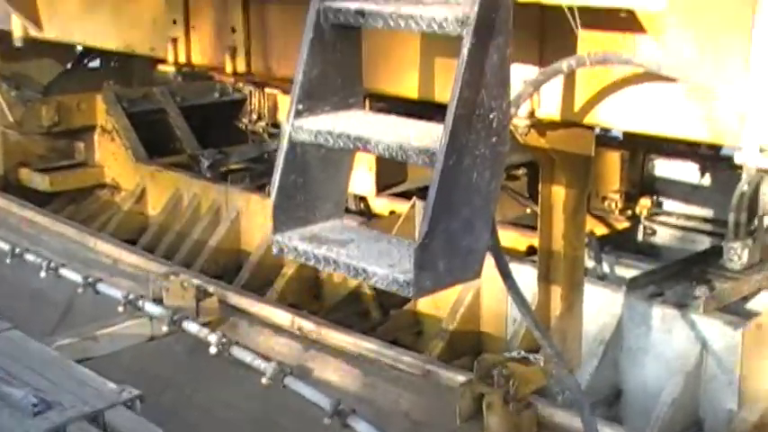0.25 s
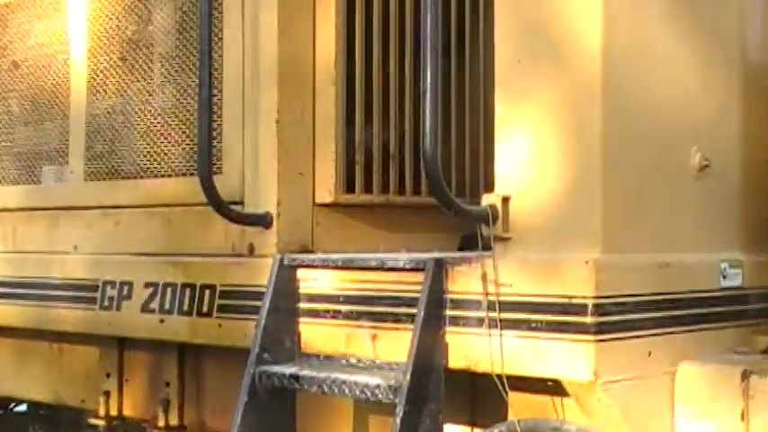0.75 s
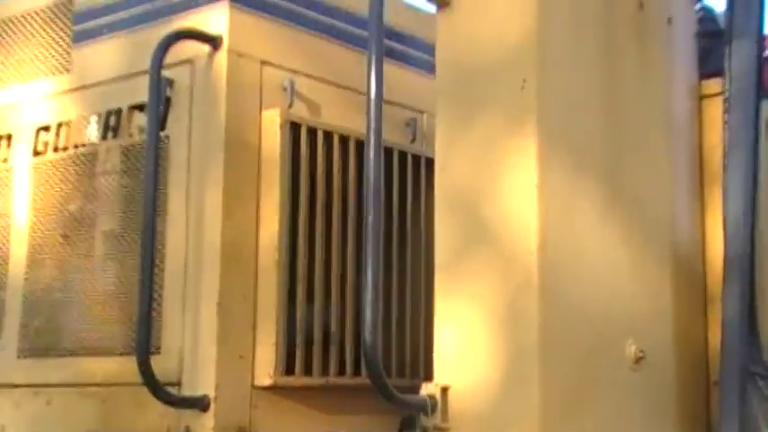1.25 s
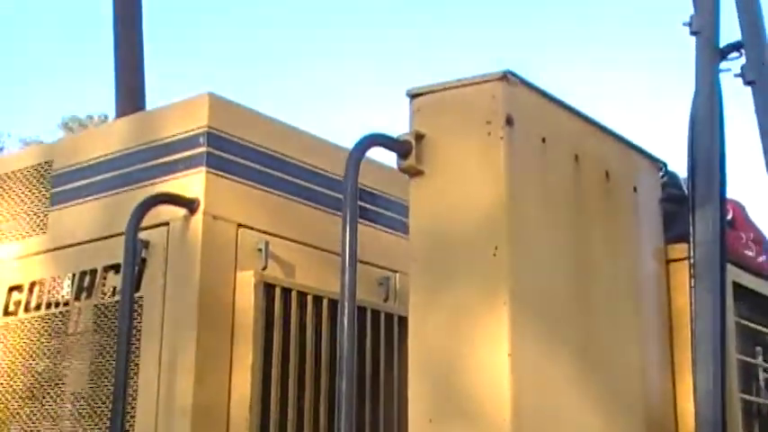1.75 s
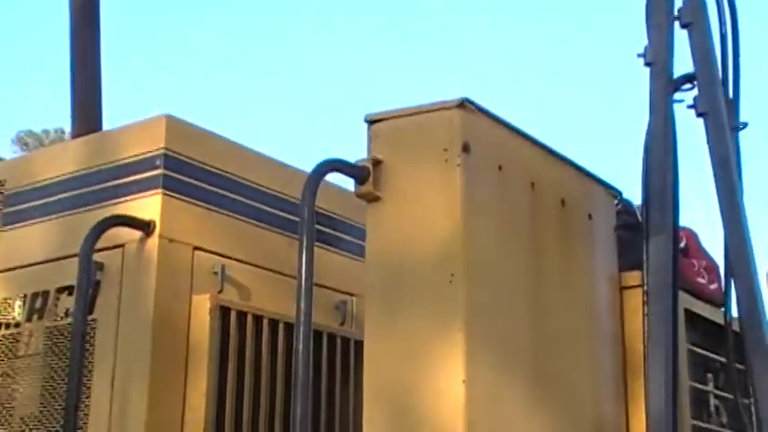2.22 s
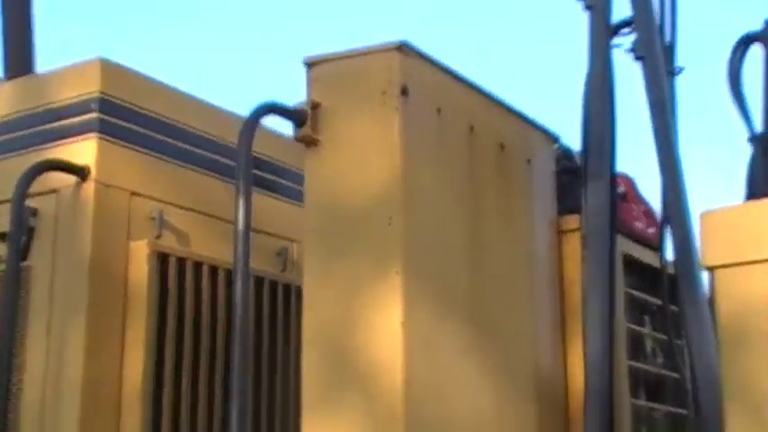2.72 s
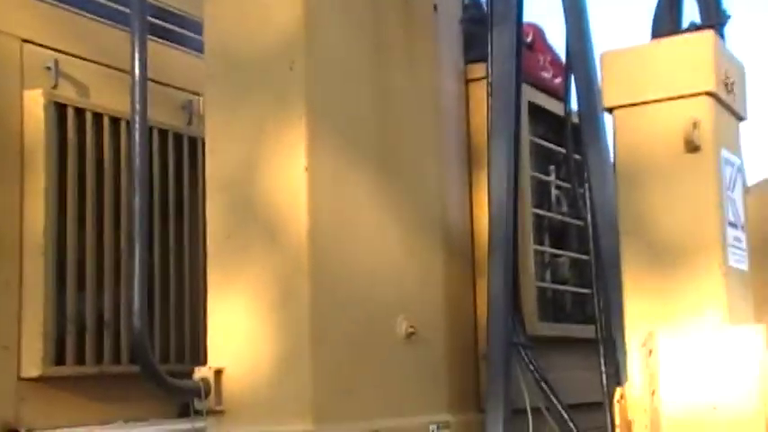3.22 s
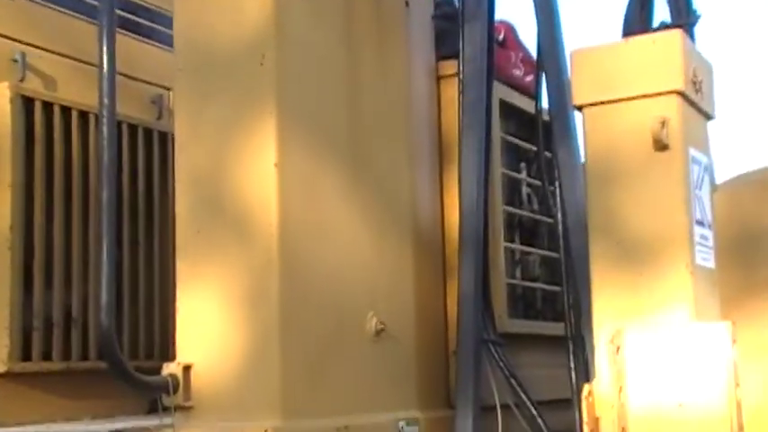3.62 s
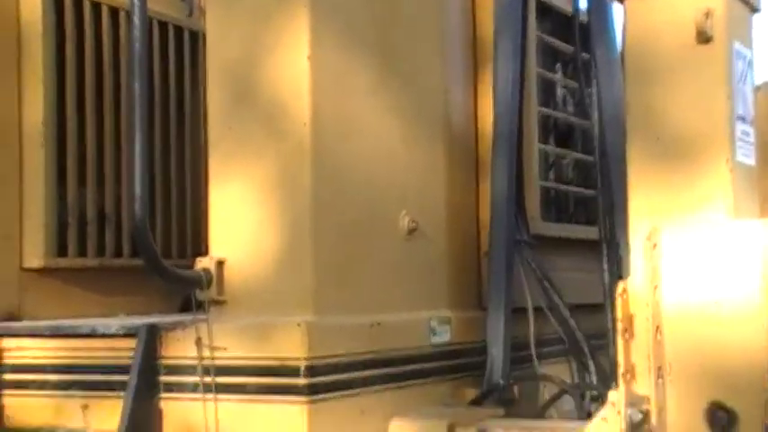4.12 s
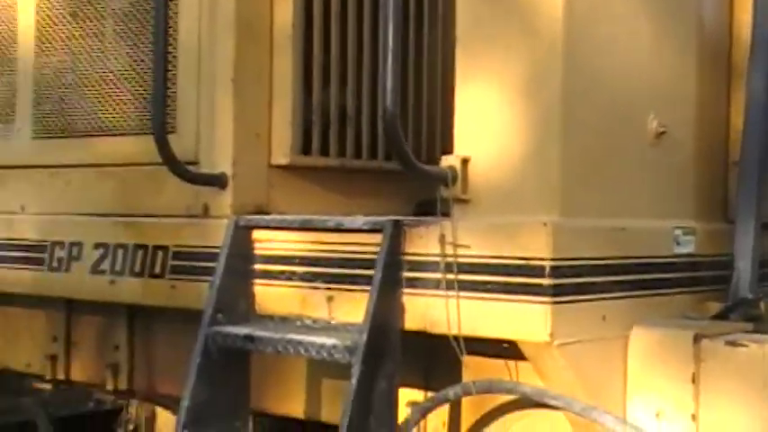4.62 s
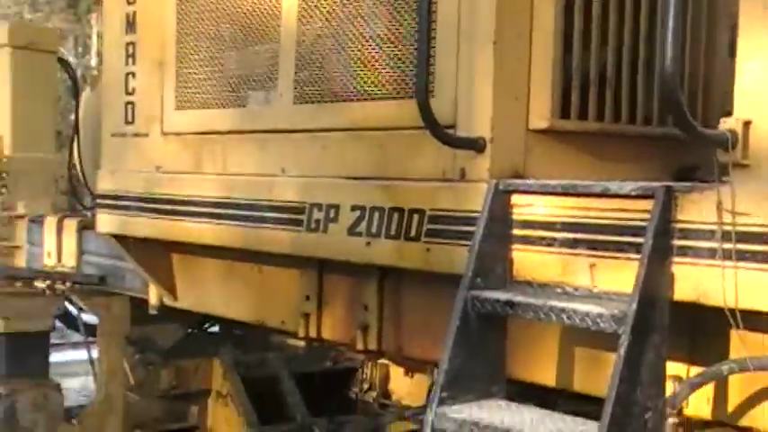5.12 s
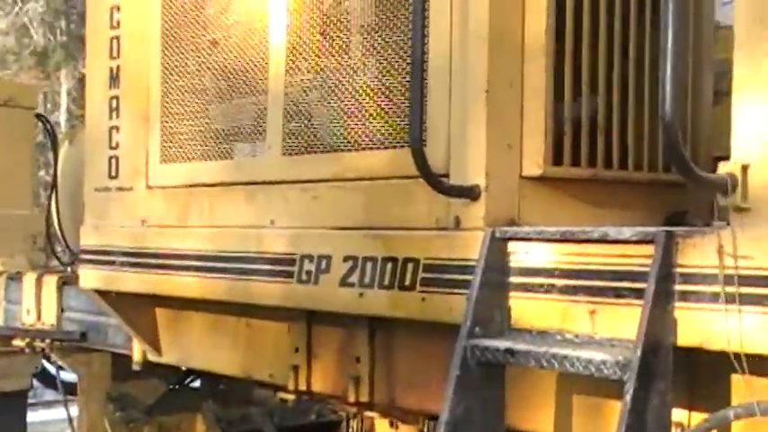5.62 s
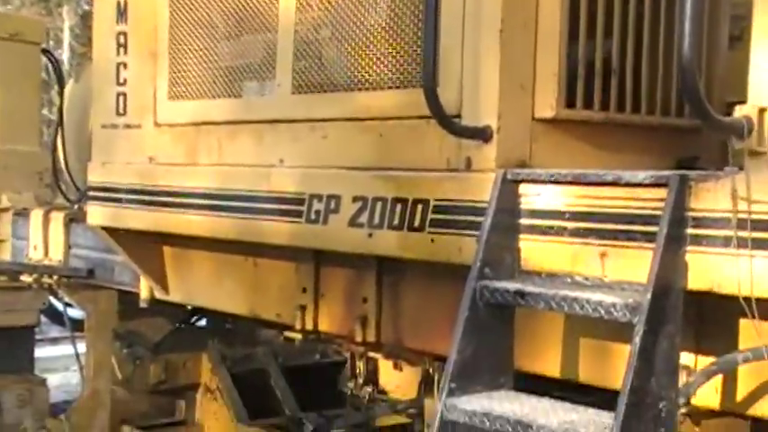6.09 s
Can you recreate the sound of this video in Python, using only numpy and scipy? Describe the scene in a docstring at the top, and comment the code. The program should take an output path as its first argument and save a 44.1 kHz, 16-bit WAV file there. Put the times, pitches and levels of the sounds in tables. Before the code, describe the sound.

A large diesel engine on a construction machine idles outdoors for about six seconds, a few steps from a slowly turning hand-held microphone. Speed and loudness stay steady. The exhaust thumps quickly, valves clatter and tick in a pattern repeating about eight times a second, and the steel housing throbs with a mid-pitched metallic ring. Cooling air roars and hisses behind it, with faint fan and gear whines. Brief thin rings sound near 0.2 and 1 second. Harder dry knocks stand out around 1.2 to 1.7 seconds, at 2.3, between 2.9 and 4.1, and again near 5.9. Soft wind puffs bump the microphone, mostly in the first second and a half and around 5.5 to 6 seconds. From about 4.5 seconds the lower panel ring grows stronger and a thin high whine comes forward slightly, while the engine keeps running.

```python
"""Big diesel idling in a steel housing

Outdoors, a few steps away, on a hand-held stereo microphone that slowly turns. Every four-stroke
cycle plays the same round: firings thump the exhaust, valves and injectors rap the block, and the
sheet-steel panels throb in step. Cooling air roars and hisses behind them, fan and gears whine
faintly, wind puffs on the microphone ports and a limiter ducks after the hardest knocks."""
import sys
import numpy as np
from scipy import signal
from scipy.fft import rfft, irfft
from scipy.io import wavfile

SR = 44100
rng = np.random.default_rng(int(sys.argv[2]) if len(sys.argv) > 2 else 0)


def transcribe(u):
    """Save the signal u as a 16-bit wav file named by the first command-line argument.

    u: samples, shape (n,) or (channels, n), limited to [-1, 1]; the rate is SR.
    q: integer samples, one column per channel.
    """
    v = np.clip(np.atleast_2d(u).T, -1, 1)
    q = np.round(v * 32767).astype(np.int16)
    wavfile.write(sys.argv[1], SR, q)


N = 280020
TIME, FREQS = np.arange(N) / SR, np.arange(N // 2 + 1) * SR / N

CYCLE_HZ = 7.88
TURN_S = .5 / CYCLE_HZ   # two crank turns to a cycle
INTAKE_HZ, LOWER_MODE_HZ, LOW_PANEL_HZ, HIGH_PANEL_HZ = 466, 914, 930, 1434
GEAR_HZ, RING_HZ, UPPER_RING_HZ, THIN_WHINE_HZ = 1891, 2364, 2459, 3255
# throbs: cycle depth/dB, loudest at t/s, crank-turn depth/dB, loudest at t/s
LOW_THROB, LOWER_THROB = (2.0, .03, 7.0, .004), (.8, .040, 3.0, .005)
HIGH_THROB, INTAKE_THROB = (4.6, .013, 2.3, .020), (6.7, .021, 8.9, .043)
ROAR_THROB, HISS_THROB = (.86, .0083, .43, .011), (.32, .002, .19, .005)

# valves and injectors rapping the block: t/s into the cycle, relative level/dB
BLOCK_RAPS = [(.000, 2.5), (.007, 2.5), (.015, -15), (.019, 4.5), (.032, 6), (.038, -2), (.046, 3.5),
              (.056, 3), (.064, 4), (.072, 1.5), (.084, 4.5), (.091, 1.5), (.099, 7), (.107, -31),
              (.114, -3), (.121, 6)]
# six firings thumping the exhaust: t/s into the cycle, relative level/dB
EXHAUST_FIRINGS = [(.032, -1.5), (.046, -1), (.056, 4.5), (.091, -10), (.114, -23), (.121, -0.5)]
# modes of the engine block and of the exhaust pipe: f/Hz, relative level/dB, t60/s
BLOCK_MODES = [(540, -5, .06), (590, -4, .06), (660, -5, .05), (730, -4, .05), (780, -4, .06),
               (820, -3, .07), (978, 0, .08), (1010, -3, .07), (1077, -2, .08), (1134, -4, .08),
               (1255, -4, .07), (1320, -1, .08), (1495, -3, .07), (1570, -3, .07), (1598, -3, .07),
               (1700, -2, .07), (1760, -3, .07), (1830, -3, .07), (1940, -2, .07), (2107, -2, .07),
               (2172, -3, .07), (2272, -3, .07), (2355, -1, .07), (2459, -2, .07), (2595, -5, .06),
               (2710, -5, .06), (2850, -8, .05), (3250, -12, .04), (3900, -14, .03)]
EXHAUST_MODES = [(211, -29, 0.04), (250.5, 26, 0.054), (290, 8, 0.027)]
# weaker modes of the high panel: f/Hz, level/dB against its main mode at the start and at the end
HIGH_PANEL_MODES = [(1321, -22, -3.5), (1375, -30, -6), (1403, -10, -12), (1418, -7, -10), (1450, -11, -12),
                    (1490, -18, -6.5), (1575, -22, -5), (1596, -11, -10), (1835, -9, -14), (1905, -22, -6)]
# modes crowding the low panel's lower mode: f/Hz, level/dB against it, phase lead/turns
LOWER_CLUSTER = [(890, -9, -.15), (898, -8, .1), (922, -4, .22), (938, -6, .15), (946, -9, -.2)]
# steady exhaust hum: harmonic of the cycle, level/dB
HUM_HARMONICS = [(8, -68.5), (16, -57), (18, -65.5), (36, -46.5)]
# fan and gear whines: f/Hz, waver/Hz, level/dB
WHINE_TONES = [(334, 2, -43.5), (977, 1.5, -38), (1134.5, 1.5, -38), (3960, 25, -46), (6700, 70, -45)]
# brief sliding rings: t/s, length/s, start f/Hz, end f/Hz, level/dB at the crest
RING_SLIDES = [(.11, .2, 1790, 1960, -26), (.93, .13, 1945, 1935, -27)]
# colour of the roar and of the hiss: f/Hz, relative level/dB
ROAR_COLOUR = [(24, -60), (40, -27), (90, -32), (130, -27), (209, -17), (333, -14), (394, -17.5),
               (457, -10), (800, -6), (1000, -7), (1130, -4.5), (1190, -9), (1300, -15.5), (1360, -4.5),
               (1410, -3.5), (1460, -6.5), (1590, -11), (1670, -8), (1850, -8), (2000, -6.5), (2110, -6),
               (2290, -10), (2390, -8.5), (2800, -11), (3400, -19), (4420, -24)]
HISS_COLOUR = [(1650, -54), (2800, -8), (3490, -10), (3920, -9.5), (4790, -7.5), (6790, -7), (9510, -9),
               (11800, -20.5), (14300, -37.5), (15500, -48)]
# how alike the air noise is left and right: f/Hz, correlation
AIR_LIKENESS = [(30, -0.41), (60, -1.04), (130, 0.72), (290, 0.92), (640, 0.92), (1410, 0.99), (3100, 0.91),
                (5000, 1), (6500, 0.92), (8500, 0.75), (11000, 0.51), (13000, 1), (15000, 1)]
# rattle locked to the crank: f/Hz, share of the mid signal's power
RATTLE_SHARE = [(60, .5), (450, .65), (900, .75), (1400, .6), (2500, .3), (4000, .05)]
# fader ride on the hiss: t/s, level/dB
HISS_RIDE = [(0, -29.3), (.25, -28.6), (.35, -30), (.55, -29.2), (.75, -29.3), (.85, -30.5), (1.0, -29),
             (1.3, -31), (1.5, -30), (2.0, -30.2), (2.6, -31), (2.9, -30), (3.4, -30.5), (3.9, -30),
             (4.4, -29.4), (4.55, -28.3), (4.65, -29.5), (4.78, -28.3), (4.9, -29.5), (5.2, -29.3),
             (5.55, -29.8), (5.85, -28.6), (6.1, -29.6), (6.35, -29)]
# valve ticks: t/s into the cycle, usual level/dB over the hiss
VALVE_TICKS = [(0.079, 3.5), (.049, 1), (0.061, 1.0), (0.0086, 5)]
# sharp knocks in every cycle: t/s into the cycle, usual strike level/dB
CYCLE_KNOCKS = [(.019, -13), (.065, -14)]
# the hardest knocks: t/s, strike level/dB
HARD_KNOCKS = [(1.161, -2), (1.288, 0), (1.415, -4), (1.715, -4), (2.298, -4), (2.938, 2), (3.064, -1),
               (3.191, 0), (3.571, 1), (3.826, -1), (4.079, -3), (5.911, -4)]
# strongest wind puffs: t/s, level/dB at the crest
WIND_PUFFS = [(.208, -32), (.482, -24), (.90, -35), (1.291, -28), (1.423, -29), (2.341, -37), (4.009, -34),
              (5.337, -34), (5.52, -37), (5.576, -29), (6.031, -31)]
# the mix as the microphone turns: t/s, left minus right/dB, level/dB of engine, high panel, gear whine
MIC_TURN = [(0, -.4, -17.0, -30, -30), (.2, -.4, -15.8, -28.5, -30), (.55, -.2, -17.3, -29, -32),
            (.9, -.1, -16.9, -25.8, -31), (1.2, -.1, -17.4, -25.6, -30), (2.1, 0, -17.3, -25, -28.5),
            (3.0, .5, -17.6, -26.2, -33), (3.8, .7, -17.4, -26.3, -36), (4.3, .2, -16.8, -30, -36),
            (4.7, -.1, -16.5, -30, -36), (5.4, -.9, -16.5, -25.2, -33), (6.35, -.9, -16.6, -25.4, -33)]
# the housing heard from changing sides: t/s, level/dB of low panel, its lower mode, metallic ring,
# upper ring and thin whine, then rattle brightness/dB
HOUSING_SIDES = [(0, -28, -30.5, -32, -42, -50, .8), (.35, -27.5, -30, -35, -42, -50, 0),
                 (.7, -30, -29.5, -38, -42, -52, .8), (1.5, -36, -29, -37, -40, -58, -.3),
                 (2.2, -37, -29, -34, -39, -58, .3), (3.0, -38, -30, -34, -38, -58, .6),
                 (3.6, -38, -30, -34, -37.5, -56, 1.5), (4.2, -33, -30, -33.5, -37, -52, 1.2),
                 (4.7, -23.5, -34, -36, -42, -45.5, .6), (5.2, -22.5, -38, -43, -48, -44.5, -1.2),
                 (5.7, -22, -38, -37, -48, -43.5, -.6), (6.35, -22.5, -38, -36, -48, -44, -.9)]
# level lean between the microphone ports: f/Hz, left minus right/dB
PORT_LEAN = [(60, 1), (110, -4), (200, 0), (380, -1), (700, 3.5), (1290, 3.5), (2380, 2.5), (4400, -1),
             (8120, -0.2), (15000, 3)]
# phase lean between the ports: f/Hz, left lead/rad
PORT_LEAD = [(0, 0), (260, 0.3), (2670, -0.1), (5860, 0.0), (8100, 0.4), (9220, 0.8), (10800, 0.4),
             (11000, 0.3), (11500, 0.1), (15200, -0.0)]


def amp(db):
    """Decibels to gain."""
    return 10 ** (np.asarray(db) / 20)


def rms_one(x):
    """Scale to rms 1."""
    return x / np.sqrt(np.mean(x ** 2) + 1e-20)


def at_hz(points):
    """A table as a curve over the spectrum, joined up on a log-frequency axis."""
    hz, values = np.transpose(points)
    return np.interp(np.log(FREQS + 1), np.log(hz + 1), values)


def in_time(rows):
    """A table's columns as automation curves, one value a sample."""
    s, *columns = np.transpose(rows)
    return [np.interp(TIME, s, column) for column in columns]


def drift(rate_hz):
    """A smooth random wander of rms about 1."""
    pole = np.exp(-80 * np.pi * rate_hz / SR)   # one step every 40 samples
    slow = signal.lfilter([1], [1, -2 * pole, pole * pole], rng.standard_normal(N // 40 + 2002))[2000:]
    return np.interp(np.arange(N) / 40, np.arange(len(slow)), rms_one(slow))


def throb(cycle_db, cycle_s, turn_db, turn_s):
    """A swell in dB, once a cycle and once a crank turn."""
    per_cycle = cycle_db * np.cos(2 * np.pi * CYCLE_HZ * (TIME - cycle_s))
    return per_cycle + turn_db * np.cos(2 * np.pi * (TIME - turn_s) / TURN_S)


def ring(clicks, hz, t60):
    """Each click sets a dying sine ringing."""
    pole, step = amp(-60 / (t60 * SR)), 2 * np.pi * hz / SR
    return signal.lfilter([0, np.sin(step)], [1, -2 * pole * np.cos(step), pole * pole], clicks + 1e-18)


def radiated(x, low_hz):
    """Little radiates below the modes, and a contact's finite length dulls the top."""
    thinned = signal.sosfilt(signal.butter(4, low_hz, "high", fs=SR, output="sos"), x)
    return signal.sosfilt(signal.butter(2, 5000, fs=SR, output="sos"), thinned)


def knock_times(contacts, jitter_s):
    """The sample of every contact in every cycle, each a touch early or late."""
    starts = np.arange(int(N / SR * CYCLE_HZ) + 1)[:, None] / CYCLE_HZ
    s = starts + np.array(contacts)[:, 0] + jitter_s * rng.standard_normal((len(starts), len(contacts)))
    return np.clip(s * SR, 0, N - 1).astype(int)


def struck(contacts, modes, habit_db, chance_db, low_hz, signs):
    """Knocked metal: each contact favours its own modes cycle after cycle, with some chance on top."""
    at, contact_db = knock_times(contacts, jitter_s=.00007), np.array(contacts)[:, 1]
    out = np.zeros(N)
    for hz, level_db, t60 in modes:
        habit = amp(habit_db * rng.standard_normal(len(contacts))) * rng.choice(signs, len(contacts))
        clicks = np.zeros(N)
        clicks[at] = habit * amp(contact_db + level_db + chance_db * rng.standard_normal(at.shape))
        out += ring(clicks, hz, t60)
    return rms_one(radiated(out, low_hz))


def sung(hz, swell_db, waver_hz, chance_db):
    """A tone the engine keeps alive, throbbing in level and wavering in pitch."""
    phase = 2 * np.pi * np.cumsum(hz + waver_hz * drift(22.0)) / SR
    return rms_one(amp(swell_db + chance_db * drift(45.0)) * np.sin(phase))


def panel_mode(hz, swell_db, strike_s, sag_hz=0):
    """Struck at the same point of every cycle, a mode locks to the cycle's nearest harmonic."""
    locked_hz = round(hz / CYCLE_HZ) * CYCLE_HZ
    sag = sag_hz * TURN_S * np.sin(2 * np.pi * (TIME + .006) / TURN_S)   # pitch droops through each throb
    phase = 2 * np.pi * locked_hz * (TIME - strike_s) + sag + .5 * drift(12.0)
    return rms_one(amp(swell_db + 1.1 * drift(14.0)) * np.sin(phase))


def engine():
    """Firings thump the exhaust pipe, valve gear clatters on the block and the intake pipe pulses."""
    exhaust = struck(EXHAUST_FIRINGS, EXHAUST_MODES, habit_db=.7, chance_db=1.5, low_hz=170, signs=[-1])
    block = struck(BLOCK_RAPS, BLOCK_MODES, habit_db=2.0, chance_db=2.5, low_hz=450, signs=[-1, 1])
    intake = sung(INTAKE_HZ, throb(*INTAKE_THROB), waver_hz=3.0, chance_db=1.5)
    return amp(-25) * exhaust + amp(-4) * block + amp(-22) * intake


def housing(low_db, lower_db, high_db, ring_db, upper_db):
    """Two steel panels throb in step with the crank, with a pair of metallic rings on top."""
    low = panel_mode(LOW_PANEL_HZ, throb(*LOW_THROB), strike_s=0, sag_hz=5)
    swell_db, strike_s = throb(*HIGH_THROB), .015
    high = panel_mode(HIGH_PANEL_HZ, swell_db, strike_s)
    for hz, start_db, end_db in HIGH_PANEL_MODES:
        high += amp(np.linspace(start_db, end_db, N)) * panel_mode(hz, swell_db, strike_s)
    lower = panel_mode(LOWER_MODE_HZ, throb(*LOWER_THROB), strike_s=TURN_S)
    for hz, db, lead in LOWER_CLUSTER:
        lower += amp(db) * panel_mode(hz, swell_db=0, strike_s=TURN_S - lead / hz)
    rings = amp(ring_db) * sung(RING_HZ, throb(*ROAR_THROB), waver_hz=5.0, chance_db=1.0)
    rings += amp(upper_db) * sung(UPPER_RING_HZ, throb(*ROAR_THROB), waver_hz=4.0, chance_db=1.0)
    return amp(low_db) * low + amp(lower_db) * lower + amp(high_db) * high + rings


def exhaust_hum():
    """A steady low bed on harmonics of the cycle."""
    phase = 2 * np.pi * CYCLE_HZ * TIME
    return sum(np.sqrt(2) * amp(db) * np.sin(harmonic * phase) for harmonic, db in HUM_HARMONICS)


def whines(gear_db, thin_db):
    """Fan and gears sing faintly, chugging with the engine."""
    chug_db = throb(*ROAR_THROB)
    out = sum(amp(db) * sung(hz, chug_db, waver_hz, chance_db=.5) for hz, waver_hz, db in WHINE_TONES)
    out += amp(gear_db) * sung(GEAR_HZ, chug_db, waver_hz=2.0, chance_db=1.5)
    return out + amp(thin_db) * sung(THIN_WHINE_HZ, chug_db, waver_hz=6.0, chance_db=1.0)


def crank_rattle():
    """Noise that comes round again every cycle and slowly renews itself."""
    size, carry_over = round(SR / CYCLE_HZ), .86
    fresh = rng.standard_normal((N // size + 9, size))
    cycles = signal.lfilter([1], [1, -carry_over], fresh, axis=0)[8:]
    return rms_one(cycles.ravel()[:N])


def cooling_air(colour, flicker_db):
    """A stereo rush with crank rattle mixed into its centre, flickering in six bands."""
    alike, share = np.clip(at_hz(AIR_LIKENESS), -1, 1), at_hz(RATTLE_SHARE)
    mid, side = rfft(rng.standard_normal((2, N)))
    mid = np.sqrt(1 - share) * mid + np.sqrt(share) * rfft(crank_rattle())
    stereo = amp(at_hz(colour)) * (np.sqrt(1 + alike) * mid + np.sqrt(1 - alike) * side * [[1], [-1]])
    out, together = 0, drift(4.6)
    edges = np.geomspace(colour[0][0], colour[-1][0], 7)
    for low, high in zip(edges, edges[1:]):
        gain = amp(flicker_db * (1.2 * together + drift(3.0)))
        out = out + gain * irfft(stereo * ((FREQS >= low) & (FREQS < high)), N)
    return rms_one(out)


def hiss():
    """The bright top of the cooling air, fluttering eight times a cycle."""
    ride_db, = in_time(HISS_RIDE)
    flutter_db = .5 * np.cos(2 * np.pi * 8 * CYCLE_HZ * TIME)
    level_db = ride_db + flutter_db + throb(*HISS_THROB) + .55 * drift(12.0)
    return amp(level_db) * cooling_air(HISS_COLOUR, flicker_db=.3)


def valve_ticks(decay_s=.004):
    """A gain for the hiss: each valve tick flashes it up and dies away."""
    at = knock_times(VALVE_TICKS, jitter_s=.001)
    chance_db = 3.5 * rng.standard_normal(at.shape).clip(-3, 1.3)
    clicks = np.zeros(N)
    clicks[at] = (amp(np.array(VALVE_TICKS)[:, 1]) - 1) * amp(chance_db)
    return 1 + signal.lfilter([1], [1, -np.exp(-1 / (decay_s * SR))], clicks + 1e-18)


def sharp_knocks():
    """Dry cracks, each one short broad pulse with the pressure falling first."""
    at = knock_times(CYCLE_KNOCKS, jitter_s=.001)
    chance_db = 2.0 * rng.standard_normal(at.shape).clip(-3, 1.5)
    clicks = np.zeros(N)
    clicks[at] = -amp(np.array(CYCLE_KNOCKS)[:, 1] + chance_db)
    for s, db in HARD_KNOCKS:
        hit = int(s * SR)
        clicks[hit - 200:hit + 200] = 0   # a hard knock takes the place of the usual one
        clicks[hit] = -amp(db)
    return radiated(ring(clicks, hz=1300, t60=.004), low_hz=400)


def sliding_rings():
    """Brief metallic rings, each swelling and fading once as its pitch slides."""
    out = np.zeros(N)
    for s, length, from_hz, to_hz, db in RING_SLIDES:
        along = np.clip((TIME - s) / length, 0, 1)
        tone = sung(from_hz + (to_hz - from_hz) * along, throb(*ROAR_THROB), waver_hz=14.0, chance_db=2.5)
        out += amp(db) * np.sin(np.pi * along) * tone
    return out


def wind(puff_s=.036):
    """Short puffs and a lumpy breeze push the two microphone ports in opposite directions."""
    def rumble(top_hz):
        band = signal.butter(2, [70, top_hz], "band", fs=SR, output="sos")
        return rms_one(signal.sosfilt(band, rng.standard_normal(N)))
    puffs = sum(amp(db) * np.exp(-2 * ((TIME - s) / puff_s) ** 2) for s, db in WIND_PUFFS)
    breeze = amp(-55 + 3.0 * drift(1.9))
    return (puffs * rumble(top_hz=290) + breeze * rumble(top_hz=195)) * [[1], [-1]]


def brightened(x, gain_db):
    """The upper rattle comes and goes with the side of the housing."""
    presence = signal.sosfiltfilt(signal.butter(2, [2450, 3500], "band", fs=SR, output="sos"), x)
    return x + (amp(gain_db) - 1) * presence


def mic_ports(x):
    """The two ports hear the machine with a level and phase lean that depends on pitch."""
    lean = amp(at_hz(PORT_LEAN) / 2) * np.exp(.5j * at_hz(PORT_LEAD))
    return irfft(rfft(x) * [lean, 1 / lean], N)


def scene():
    """Engine, housing, cooling air and wind at a turning microphone."""
    pan_db, engine_db, high_db, gear_db = in_time(MIC_TURN)
    low_db, lower_db, ring_db, upper_db, thin_db, bright_db = in_time(HOUSING_SIDES)
    metal = amp(engine_db) * engine() + housing(low_db, lower_db, high_db, ring_db, upper_db)
    tones = exhaust_hum() + whines(gear_db, thin_db) + sliding_rings()
    roar = amp(engine_db - 2.5 + throb(*ROAR_THROB)) * cooling_air(ROAR_COLOUR, flicker_db=.65)
    ticking_hiss = valve_ticks() * hiss()
    machine = brightened(metal + tones + roar, bright_db) + ticking_hiss + sharp_knocks()
    return mic_ports(machine) * amp([pan_db / 2, -pan_db / 2]) + wind()


def record(dry):
    """A limiter grabs the peaks and lets go slowly; a steep filter cuts the very top."""
    threshold_db, cutoff_hz = -1.2, 15600
    peak_db = 20 * np.log10(np.abs(dry).max(0) + 1e-9)
    over_db = np.maximum(peak_db - threshold_db, 0)
    release_db = 20.0 * TIME
    held_db = np.maximum.accumulate(over_db + release_db) - release_db
    duck_db = .9 * signal.lfilter([.02], [1, -.98], held_db)   # 10:1, attack about 1 ms
    ducked = dry * amp(-duck_db)
    rounded = ducked / (1 + ducked ** 16) ** (1 / 16)   # soft-clip what slips past
    return signal.sosfilt(signal.cheby2(20, 60, cutoff_hz, fs=SR, output="sos"), rounded)


dry = scene()
out = record(dry)
transcribe(out)
```